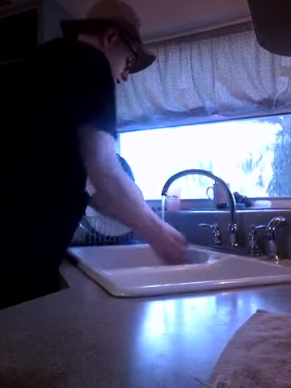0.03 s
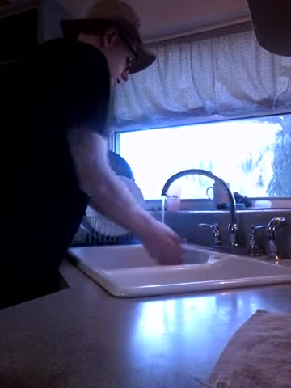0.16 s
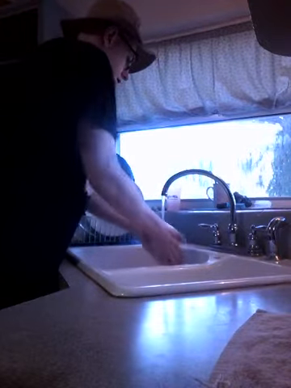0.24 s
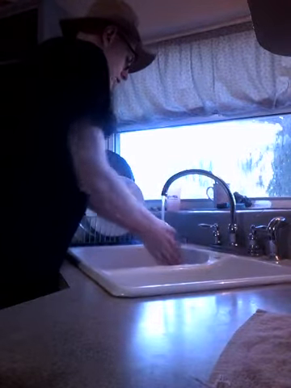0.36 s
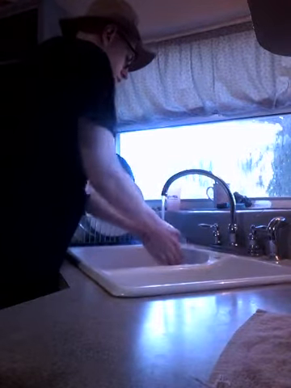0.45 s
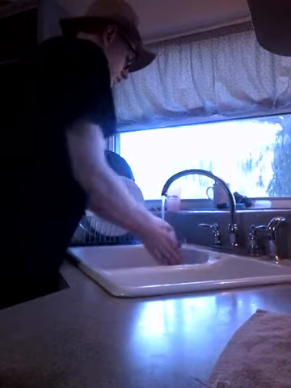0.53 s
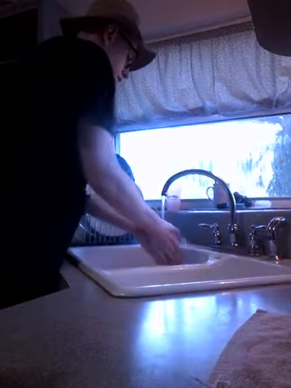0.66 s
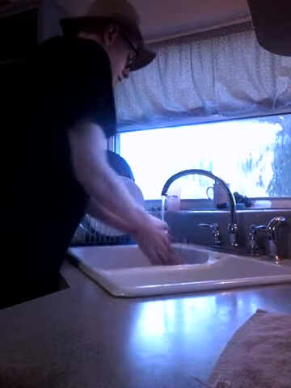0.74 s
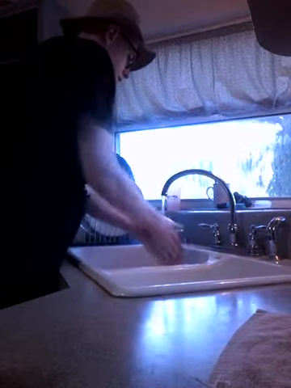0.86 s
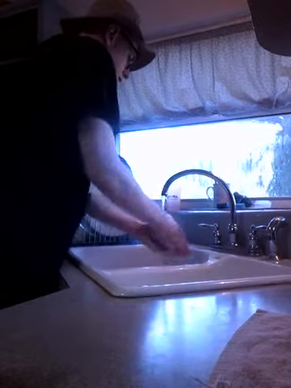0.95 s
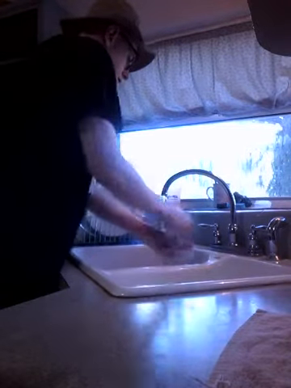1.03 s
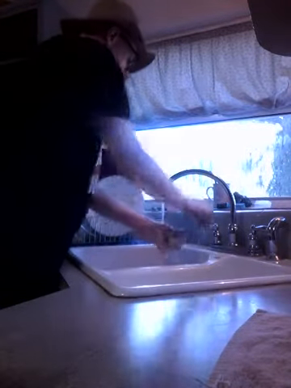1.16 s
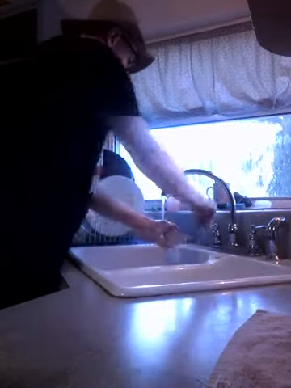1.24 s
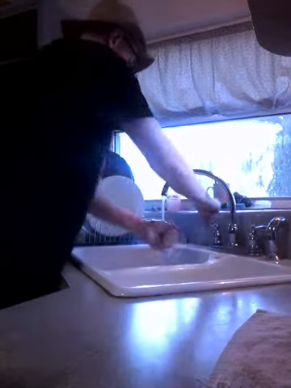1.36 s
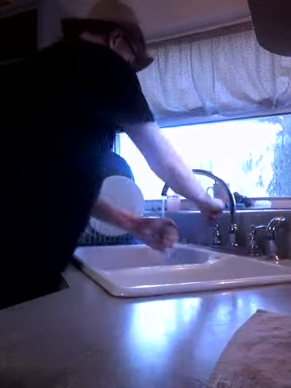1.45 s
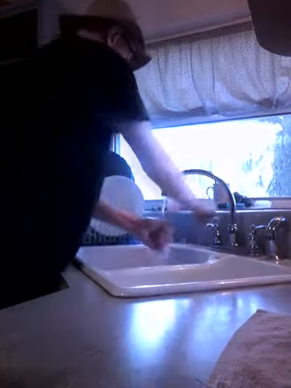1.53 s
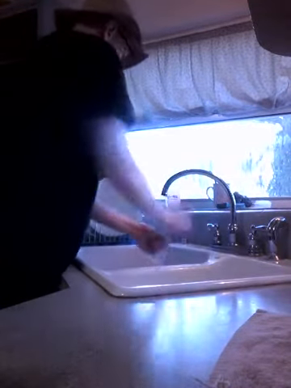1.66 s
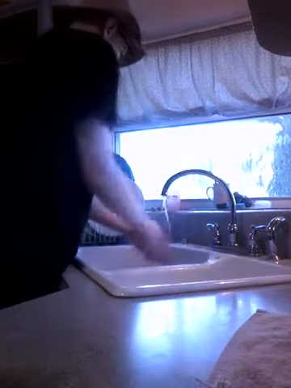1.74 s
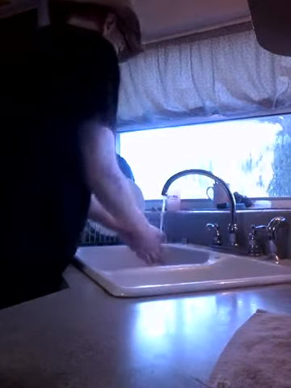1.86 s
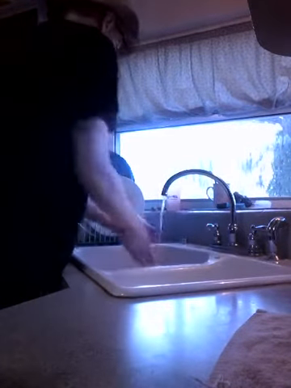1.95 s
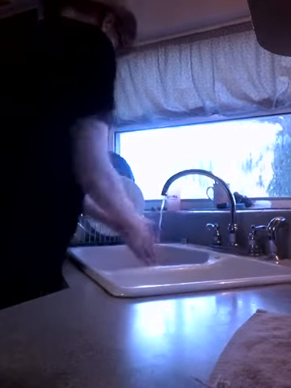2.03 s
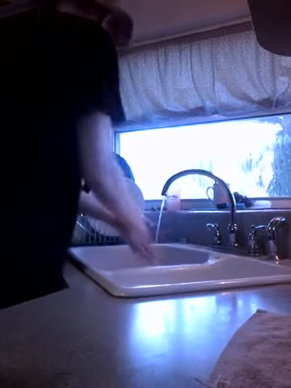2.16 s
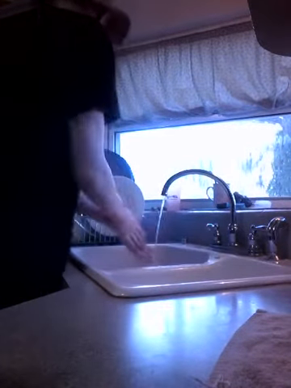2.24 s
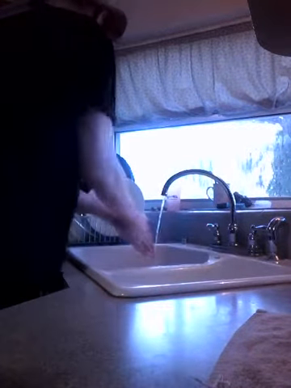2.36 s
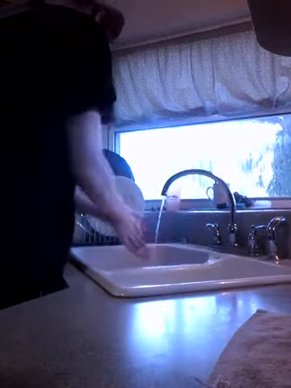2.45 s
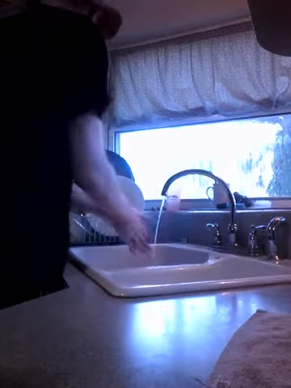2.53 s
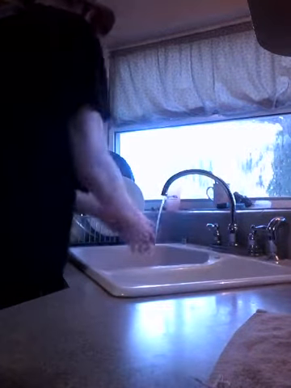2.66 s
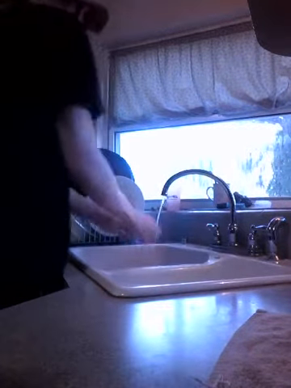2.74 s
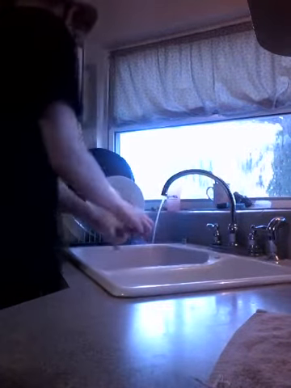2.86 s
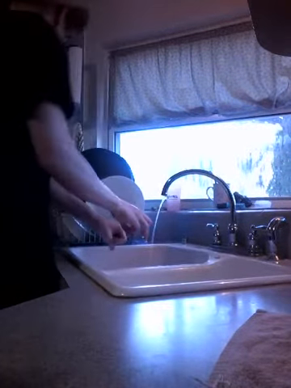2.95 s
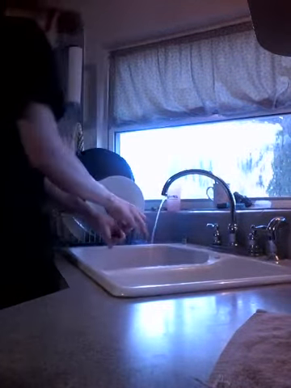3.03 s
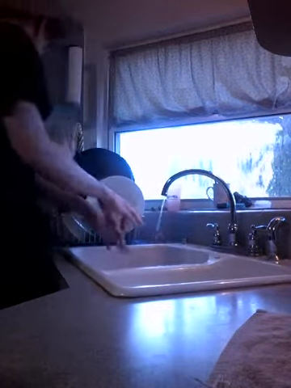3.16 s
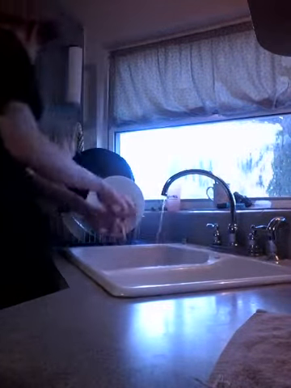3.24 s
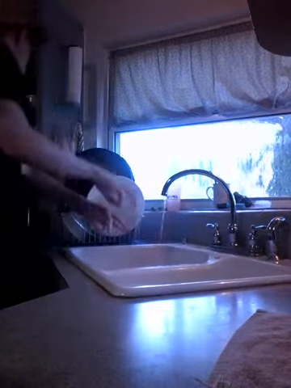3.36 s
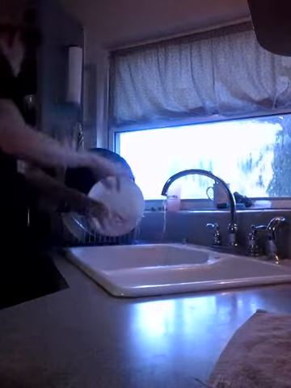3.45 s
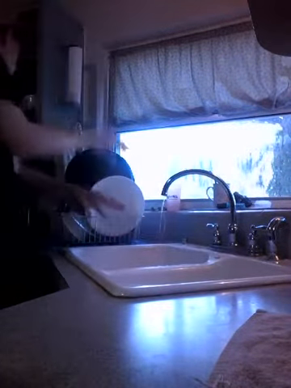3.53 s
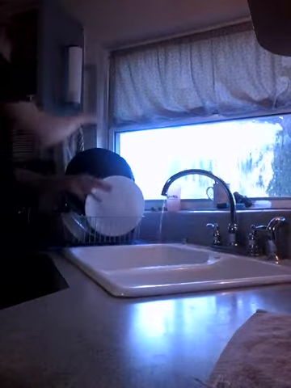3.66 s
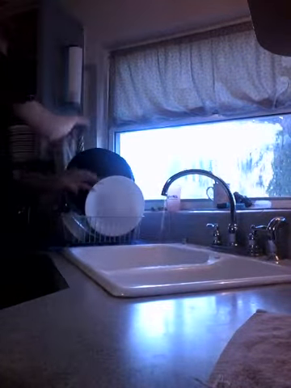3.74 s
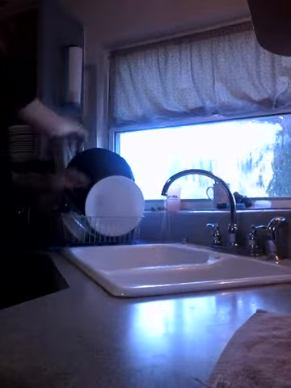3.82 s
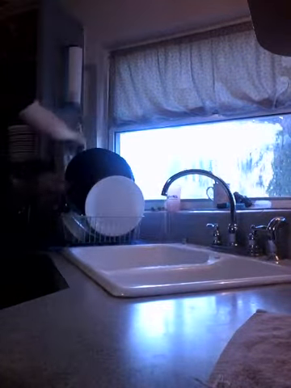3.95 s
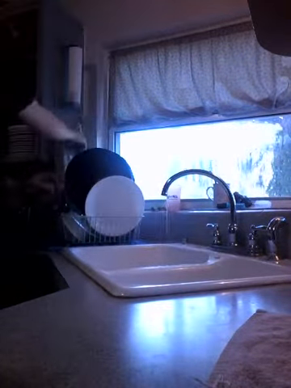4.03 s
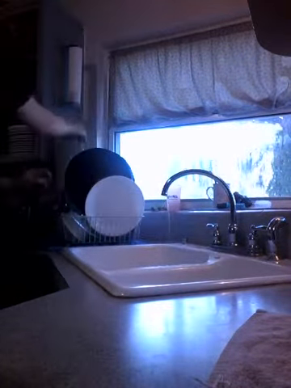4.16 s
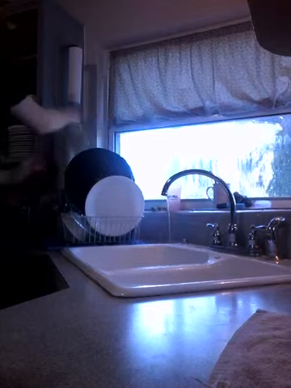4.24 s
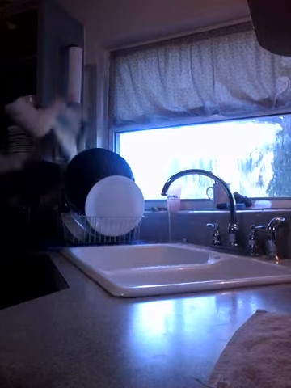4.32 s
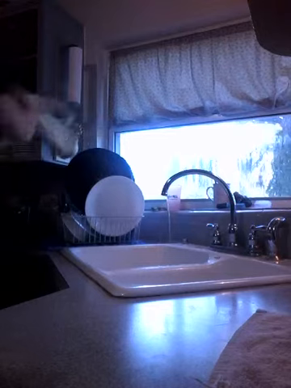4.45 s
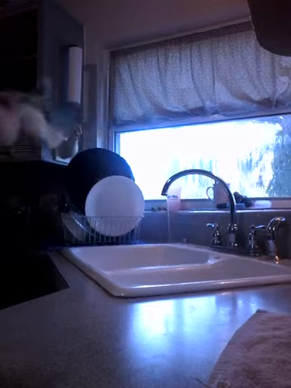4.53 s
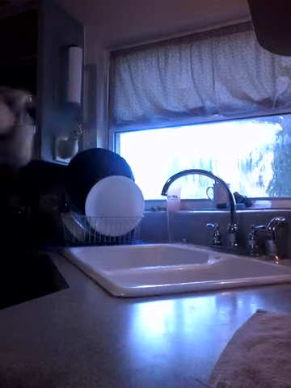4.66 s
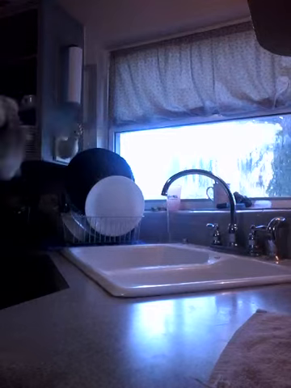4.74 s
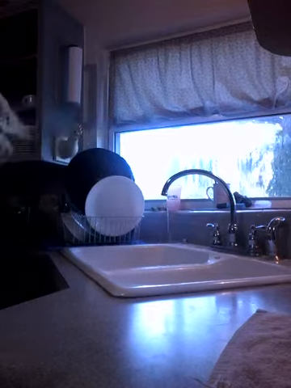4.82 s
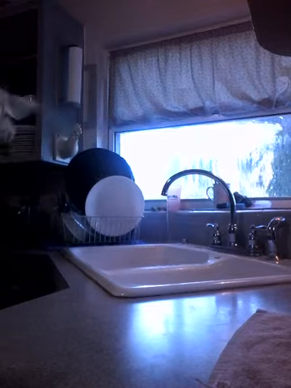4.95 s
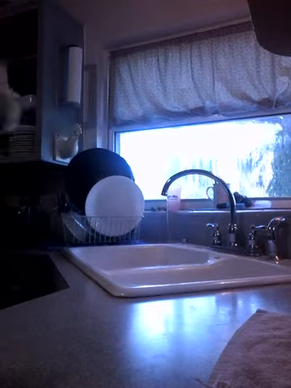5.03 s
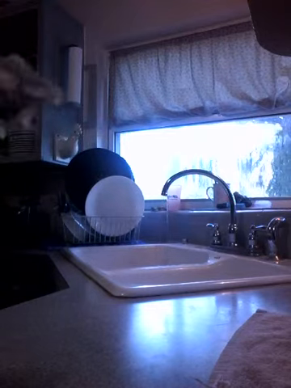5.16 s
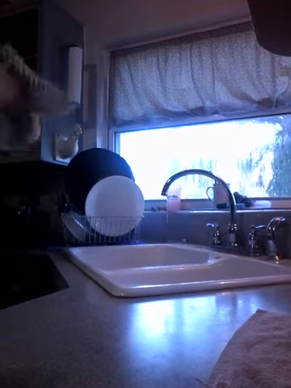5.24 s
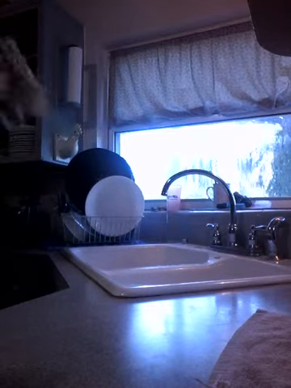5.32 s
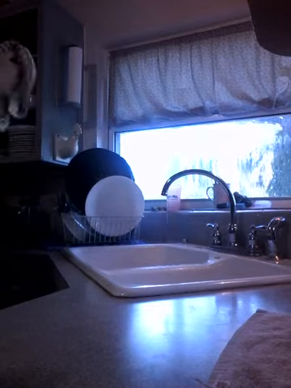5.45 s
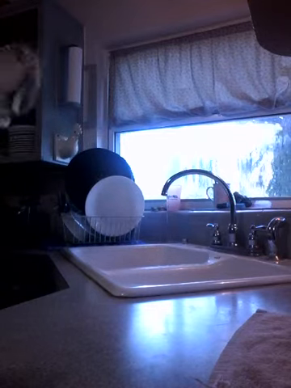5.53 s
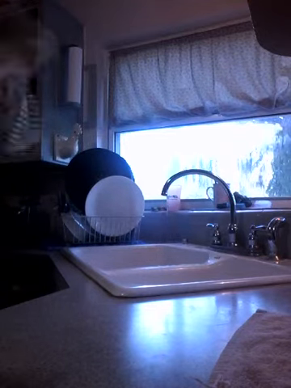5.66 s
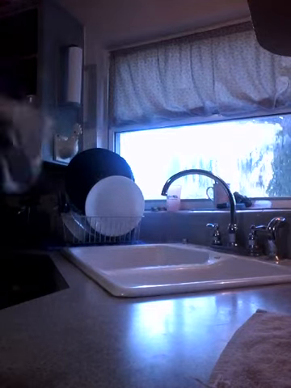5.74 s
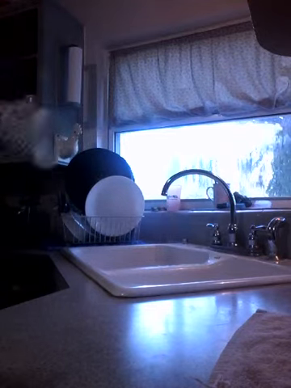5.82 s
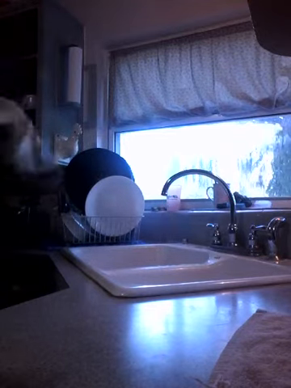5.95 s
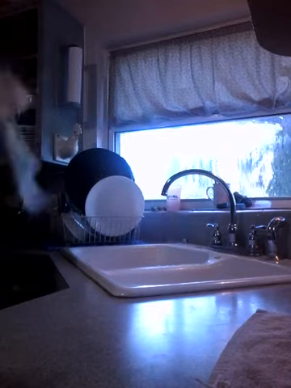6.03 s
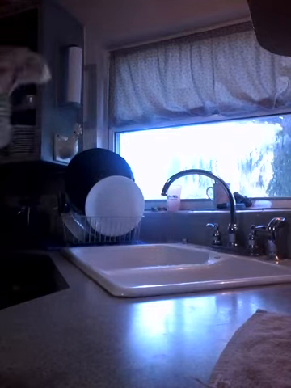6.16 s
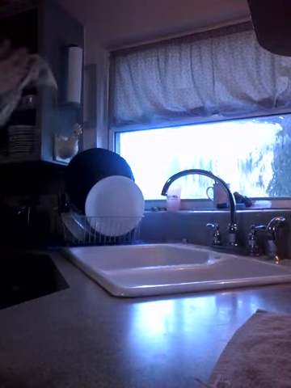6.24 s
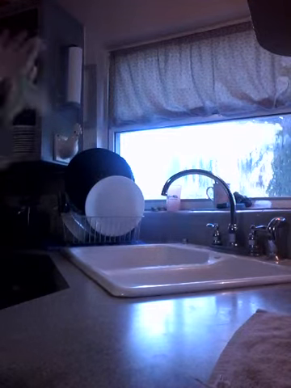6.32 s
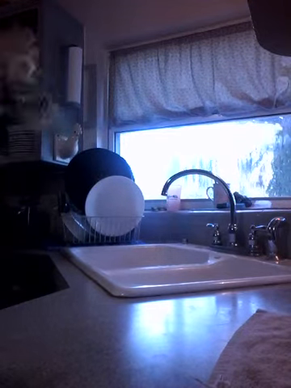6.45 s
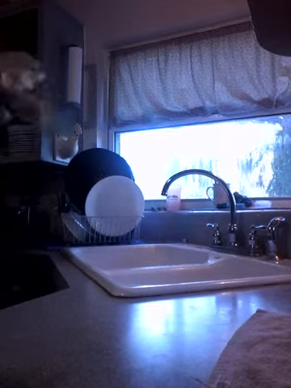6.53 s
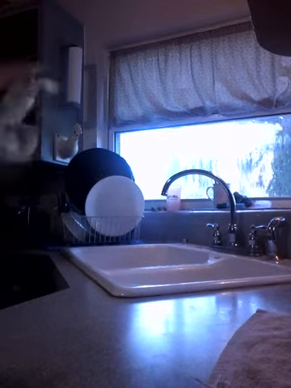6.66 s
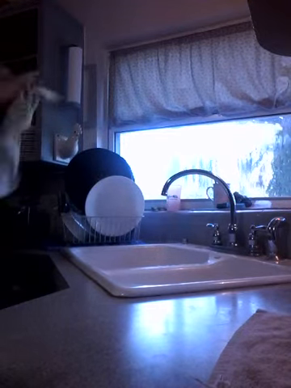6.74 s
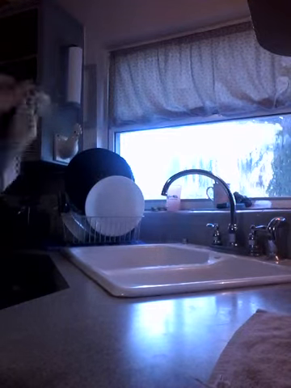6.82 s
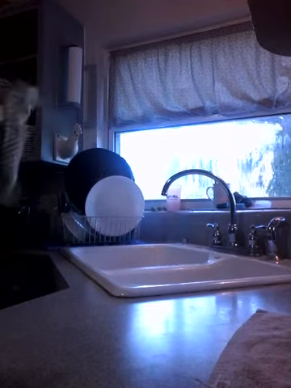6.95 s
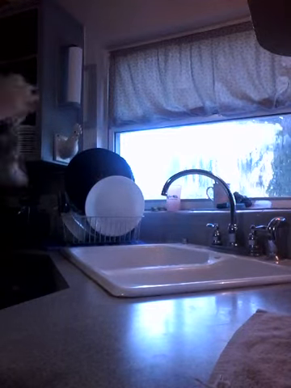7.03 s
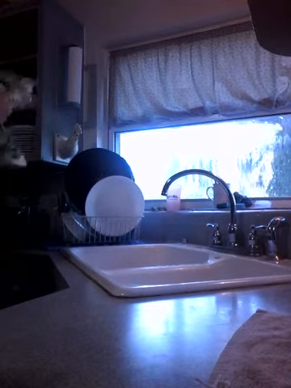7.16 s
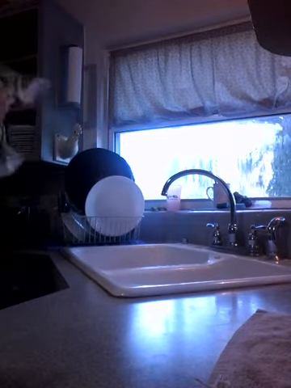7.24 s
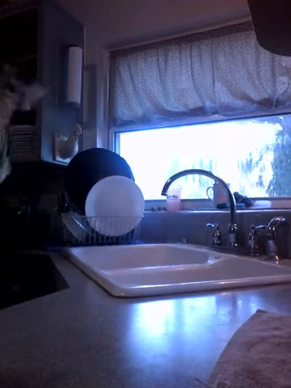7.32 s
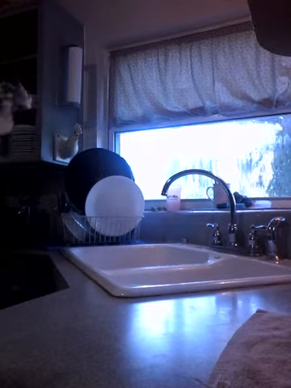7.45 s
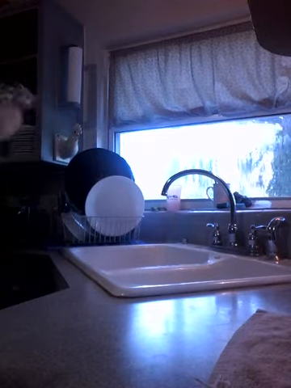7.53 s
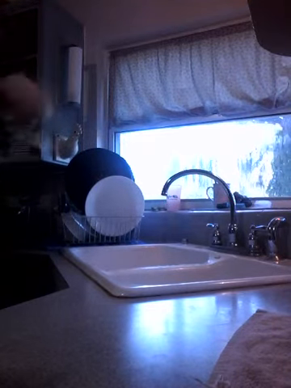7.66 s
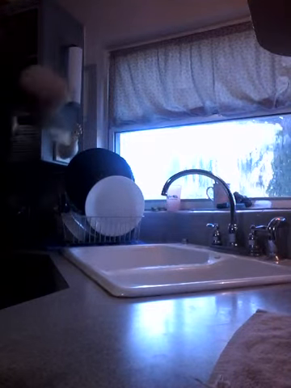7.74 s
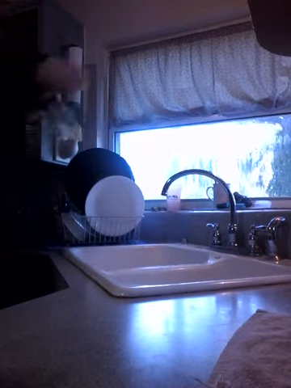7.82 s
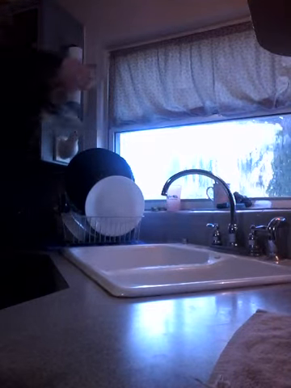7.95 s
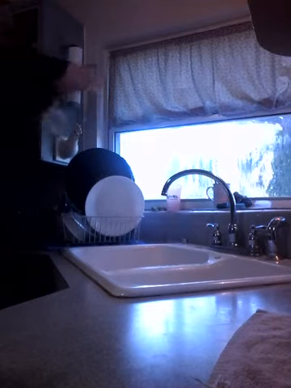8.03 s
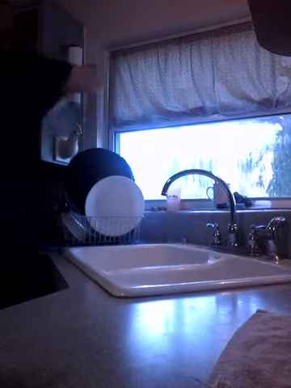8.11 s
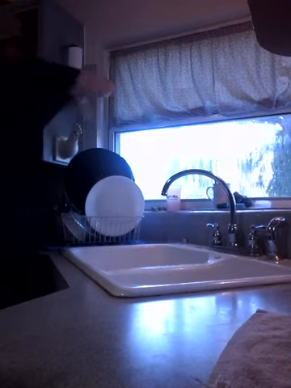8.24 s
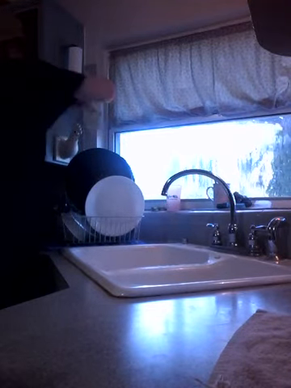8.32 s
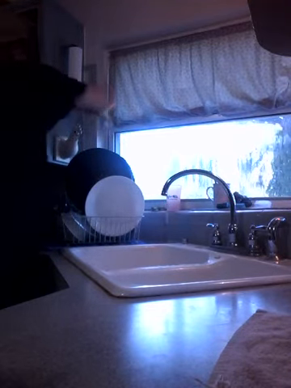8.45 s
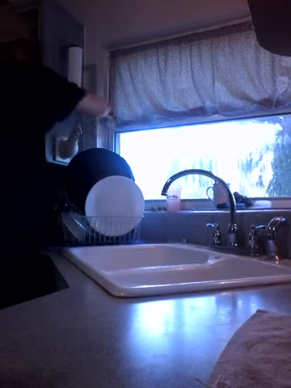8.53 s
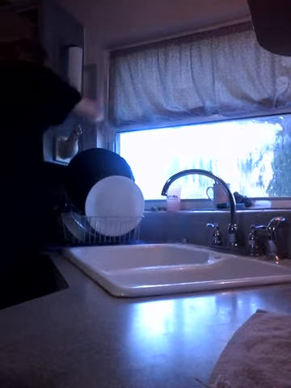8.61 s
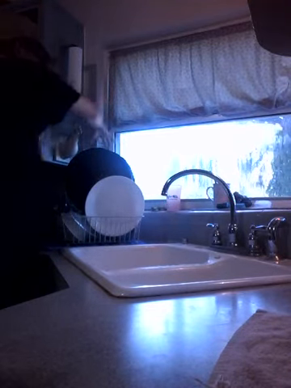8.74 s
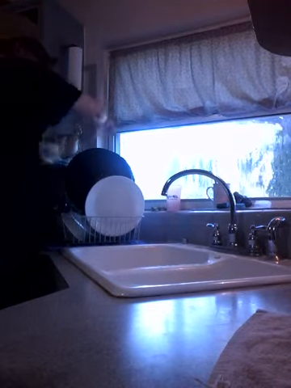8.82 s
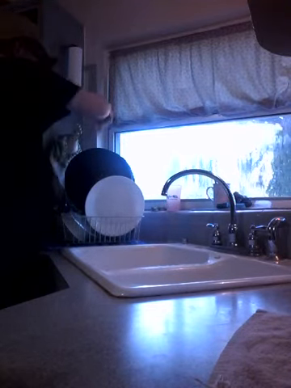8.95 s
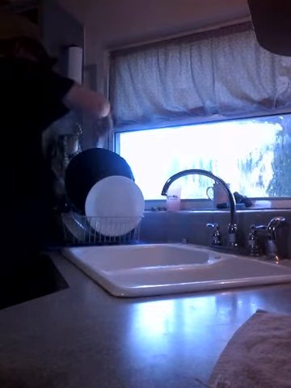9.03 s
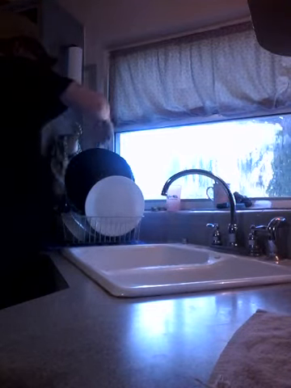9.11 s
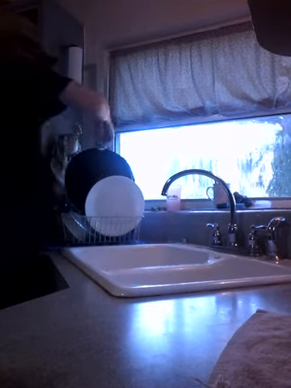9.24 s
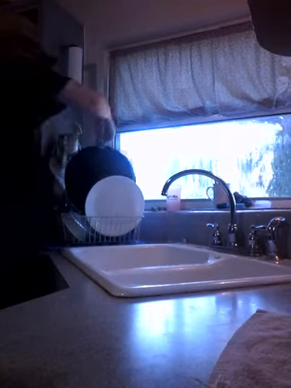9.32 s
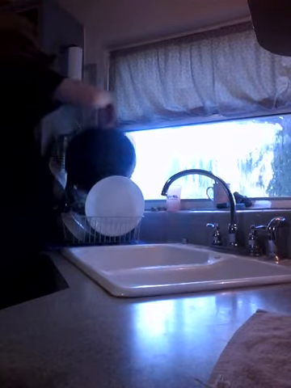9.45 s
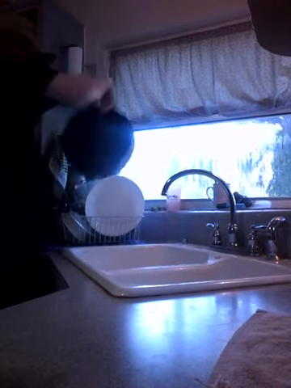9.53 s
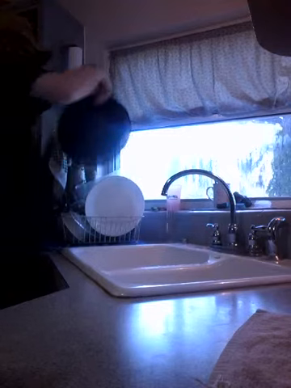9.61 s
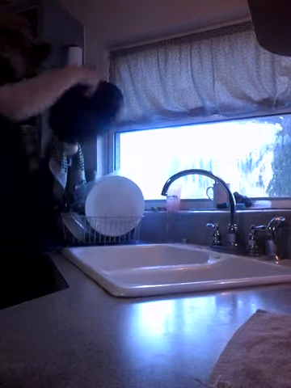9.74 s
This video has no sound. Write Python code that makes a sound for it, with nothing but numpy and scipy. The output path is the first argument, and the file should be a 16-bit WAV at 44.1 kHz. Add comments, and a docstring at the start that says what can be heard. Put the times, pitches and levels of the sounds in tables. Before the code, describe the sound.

Brisk watery slaps in a sink stop with a thin rising squeal; drips, faint cloth swishes and soft bumps follow before a ringing pan knock.

```python
"""Hands are rinsed under a kitchen tap: droplet hiss and slaps of short rising bubbles over pipe resonances.
The valve squeals shut, a narrow rising whistle; drops are shaken off and noise pulses gurgle in the drain.
Then a towel rubs the hands in swishes of grainy hiss, and things bump softly as damped low notes.
Dishes shift, and a pan knocked out of the rack cracks in noise bursts and rings in beating modes.
Low rumble fills the hard-walled kitchen, an echo of random taps; two small microphones a hand apart."""
import sys
import numpy as np
from scipy import signal
from scipy.fft import rfft, irfft, next_fast_len
from scipy.io import wavfile
from scipy.ndimage import uniform_filter1d

SR = 44100
rng = np.random.default_rng(int(sys.argv[2]) if len(sys.argv) > 2 else 0)


def generate_wav(signal):
    """Clip the signal to [-1, 1] and save it as 16-bit WAV at the path in sys.argv[1]."""
    frames = np.transpose(np.atleast_2d(signal))
    scaled = np.clip(frames, -1, 1) * 32767
    pcm = np.round(scaled).astype(np.int16)
    wavfile.write(sys.argv[1], SR, pcm)


N = 431298

# Colour of falling water. Each row: frequency in Hz, relative density in dB per Hz.
SPRAY_TONE = [(410, -47), (700, -15), (1460, -11.5), (2990, -11), (4150, -22.5), (5610, -16.5), (9110, -25),
              (14600, -23)]
# Slaps of water and flung drops in the basin.
# Each row: start in seconds, bubble level in dB, bubble pitch in Hz, spatter level in dB.
SPLASHES = [(0.011, -23, 2630, -40), (0.1201, -24.5, 1127, -36.5), (0.2308, -26.5, 1390, -39),
            (0.3296, -23.5, 1230, -43), (0.4287, -25.5, 2130, -38.5), (0.546, -24.5, 1660, -35.5),
            (0.632, -22.5, 2050, -38.5), (0.685, -26.5, 1710, -39), (0.7854, -22, 2840, -37),
            (0.8536, -22.5, 2140, -34.5), (0.932, -22, 2600, -42.5), (1.0893, -20, 2930, -32.5),
            (1.278, -26, 3200, -42.5), (1.326, -27, 1690, -37), (1.3662, -14.5, 2350, -39),
            (1.392, -20, 1764, -49), (1.397, -18, 3180, -46), (1.5377, -40, 5990, -41.5),
            (1.559, -18.5, 2060, -37), (1.601, -24.5, 2680, -34), (1.774, -33, 3580, -33.5),
            (1.8067, -23, 2600, -40.5), (1.983, -15.5, 2590, -40), (1.9946, -17.5, 2130, -52),
            (2.06, -27, 3060, -32), (2.072, -22.5, 1800, -52), (2.218, -32.5, 3140, -43),
            (2.254, -34, 5500, -47), (2.296, -31.5, 1700, -57), (2.31, -26, 3170, -43.5),
            (2.3423, -31, 1670, -62), (2.426, -34.5, 2100, -48.5), (2.456, -27, 3070, -65),
            (2.4737, -28.5, 2020, -44.5), (2.556, -29.5, 1600, -45.5), (2.678, -49, 5200, -50.5),
            (2.959, -45, 5440, -46.5), (3.081, -30, 2410, -49), (3.0998, -33, 6900, -43),
            (3.437, -43.5, 2400, -54)]
# Colour of the pan's crack on the rack. Each row: frequency in Hz, relative density in dB per Hz.
CRACK_TONE = [(60, -48), (150, -2), (250, 4.5), (1800, 4), (3300, 0), (4100, -8.5), (6000, -13),
              (16000, -67)]
# The pan strikes the rack and rebounds. Each row: start in seconds, level in dB.
KNOCK = [(9.4302, -14), (9.4352, -12.5), (9.4386, -21)]
# A plate in the rack is touched first. One row: start in seconds, ring level in dB.
PLATE_TOUCH = (9.36, -25.5)
EDGE_HZ = 15900  # upper band limit, also the reference for treble tilts
SHUT_AT_S = 1.411  # the tap shuts
SPATTER_S = 0.033  # time constant of the spatter's decay


def gain_of(db):
    """Decibels to an amplitude factor."""
    return 10 ** (np.asarray(db) / 20)


def evened(x):
    """Scales to rms 1."""
    return x / np.sqrt(np.mean(x ** 2) + 1e-20)


def read(points, hz):
    """A spectrum table at the given frequencies, interpolated along log frequency."""
    f, value = np.transpose(points)
    return np.interp(np.log(hz + 1), np.log(f + 1), value)


def columns(rows):
    """A gate that is open while a curve lasts, then each of its columns at every sample."""
    s, *values = np.transpose(rows)
    t = np.arange(N) / SR
    gate = uniform_filter1d(1. * ((t >= s[0]) & (t <= s[-1])), size=400)
    return gate, *(np.interp(t, s, v) for v in values)


def add(mix, s, sound):
    """Mixes a sound in at a time in seconds."""
    part = mix[round(s * SR):][:len(sound)]
    part += sound[:len(part)]


def coloured(x, db):
    """Filters by a function of frequency in dB."""
    size = next_fast_len(x.shape[-1] + 4096)
    gain = gain_of(db(np.fft.rfftfreq(size, 1 / SR)))
    return irfft(rfft(x, size) * gain, size)[..., :x.shape[-1]]


def resonate(x, hz, width):
    """Shifts the curve hz down to zero, smooths, and shifts back: a resonance of gain 1."""
    turn = np.exp(2j * np.pi * np.cumsum(hz * np.ones(x.shape[-1])) / SR)
    r = np.exp(-np.pi * width / SR)
    return 2 * (turn * signal.lfilter([1 - r], [1, -r], x / turn)).real


def humps(noise, modes):
    """Steady noise through a set of steep resonances, each at its own rms level."""
    size = next_fast_len(N)
    f = np.fft.rfftfreq(size, 1 / SR)
    shapes = [(db, 1 / (1 + (2 * (f - hz) / width) ** 2)) for hz, width, db in modes]
    response = sum(gain_of(db) * evened(shape) for db, shape in shapes)
    return irfft(rfft(noise, size) * response, size)[..., :N]


def grainy(spread_db, per_s, smooth):
    """Two channels of hiss mixed with droplet clicks of very unequal size."""
    size = gain_of(spread_db * np.minimum(rng.exponential(1, N), 5)) * (rng.random(N) < per_s / SR)
    burst = signal.lfilter([1], [1, -.95], size)  # each click spreads over half a millisecond
    return (smooth + evened(burst)) * rng.standard_normal((2, N))


def patchy(x, spread_db):
    """Colours a sound with drifting random patches of frequency and time."""
    z = signal.stft(x, nperseg=256)[2]
    field = uniform_filter1d(rng.standard_normal(z.shape[1:]), size=10, axis=0)
    field = evened(uniform_filter1d(field, size=10, axis=1))
    return signal.istft(z * gain_of(spread_db * field), nperseg=256)[1][:, :N]


def struck(modes, t):
    """A struck body's modes: dying sines, neighbours of opposite sign."""
    return sum((-1) ** k * gain_of(db - 60 * t / t60) * np.sin(2 * np.pi * hz * t)
               for k, (hz, db, t60) in enumerate(modes))


def hollow(rows, per_s, width, overtone):
    """Soft random pushes ring a hollow whose note wanders, with a broad overtone."""
    gate, level_db, hz = columns(rows)
    pushes = rng.standard_normal(N) * (rng.random(N) < per_s / SR)
    note = evened(resonate(resonate(pushes, hz, width), hz, 3 * width))
    upper = evened(resonate(resonate(pushes, 2.67 * hz, 250), 2.57 * hz, 240))
    return gate * gain_of(level_db) * (note + overtone * upper)


def rumble():
    """Steady low noise with a few wavering notes, over faint hiss."""
    # Colour of the room. Each row: frequency in Hz, relative density in dB per Hz.
    room_tone = [(20, -24), (45, -29), (65, -18), (100, -19.5), (170, -0.5), (230, -12), (600, -26.5),
                 (1200, -34), (3200, -49.5), (4000, -58), (5500, -52), (8000, -56), (14000, -48.5)]
    # Wavering notes in the rumble. Each row: frequency in Hz, width in Hz, level in dB.
    room_notes = [(135.3, 6.5, -47.5), (179.4, 5.1, -51), (753, 24, -67)]
    noise = rng.standard_normal((2, N))
    bed = evened(coloured(noise, lambda hz: read(room_tone, hz)))
    return bed * gain_of(-39.5) + humps(noise, room_notes)


def kitchen(x):
    """Hard walls as sparse taps of random sign, one in every 20 samples, each band dying at its own speed."""
    # Decay of the room. Each row: frequency in Hz, time to fall 60 dB in seconds.
    decay = [(100, 0.056), (500, 0.58), (2000, 0.12), (6000, 0.14), (15000, 0.18)]
    taps = np.zeros((2, SR))
    at = np.arange(100, SR - 20, 20) + rng.integers(0, 20, (2, (SR - 101) // 20))
    np.put_along_axis(taps, at, rng.choice([-1., 1.], at.shape), 1)
    hz, t, z = signal.stft(taps, SR, nperseg=256)
    tail = signal.istft(z * gain_of(-60 * t / read(decay, hz)[:, None]), SR, nperseg=256)[1]
    return signal.fftconvolve(x * np.ones((2, 1)), tail / np.linalg.norm(tail[0]), axes=1)[:, :N]


def squeaks():
    """Faint squeaks and ticks: short fuzzy tones of resonated noise; the shorter, the broader."""
    # Each row: start in seconds, pitch in Hz, level in dB, length in seconds.
    faint_tones = [(3.96, 1733, -61, 0.082), (6.452, 6100, -48.5, 0.021), (6.745, 2990, -64, .045),
                   (7.503, 1450, -53, 0.021)]
    out = np.zeros(N)
    for s, hz, db, length in faint_tones:
        t = np.arange(0, length, 1 / SR)
        width = hz * (0.014 / length) ** 2
        tone = resonate(resonate(rng.standard_normal(4000), hz, width), hz, width)[-len(t):]
        add(out, s, gain_of(db) * evened(tone) * np.sin(np.pi * (t / length) ** 0.7))
    return out


def bumps():
    """A quickly damped low note with a looser overtone, and a short dull click."""
    # Soft bumps. Each row: start in seconds, note level in dB, pitch in Hz, click level in dB.
    soft_knocks = [(1.45, -22, 297, -36.5), (1.566, -23, 331, -40.5), (1.805, -29, 294, -49),
                   (2.118, -25.5, 603, -40.5), (3.944, -47, 503, -45.5), (3.99, -24, 285, -50),
                   (4.38, -34.5, 278, -49), (4.485, -37, 714, -44.5), (5.315, -21.5, 133.4, -42.5),
                   (5.62, -26, 171, -57), (5.751, -32, 169, -45.5), (7.134, -39, 298, -48),
                   (8.864, -34.5, 530, -50), (9.22, -32.5, 250, -49)]
    decay_cycles, click_t60_s = 3.45, 0.13  # cycles in one time constant; seconds to fall 60 dB
    out, t = np.zeros(N), np.arange(8000) / SR
    rattle = evened(resonate(resonate(rng.standard_normal(N), 900, 1400), 900, 1400))
    for s, db, hz, click_db in soft_knocks:
        note = np.sin(2 * np.pi * hz * t) + 0.24 * np.sin(2 * np.pi * 1.7 * hz * t)
        note = note * (1 - np.exp(-t / 0.0011))
        click = gain_of(click_db - 60 * t / click_t60_s) * (1 - np.exp(-t / 0.00038))
        click = click * rattle[round(s * SR):][:len(t)]
        add(out, s, gain_of(db) * np.exp(-t * hz / decay_cycles) * note + click)
    return out


def dishes():
    """Crockery slides and settles on the wires: dense random pushes ring a wandering note."""
    # Dishes shift in the rack. Each row: time in seconds, level in dB, note in Hz.
    shift = [(8.84, -63, 394), (8.95, -42, 400), (9.03, -43.5, 307), (9.16, -58, 300)]
    return hollow(shift, 530, 130, 0.062)


def clatter():
    """The plate's tick, three quick bright cracks of the pan, and the rattle of the rack's wires."""
    out, t = np.zeros(N), np.arange(SR // 2) / SR
    crack = evened(coloured(rng.standard_normal(len(t)), lambda hz: read(CRACK_TONE, hz)))
    snap = coloured(crack, lambda hz: 22 * hz / EDGE_HZ)  # brighter
    for k, (s, db) in enumerate(KNOCK):
        envelope = gain_of(db - 60 * t / 0.015) * (1 - np.exp(-t / 0.00044))
        add(out, s, envelope * np.roll(snap, shift=999 * k))  # a different stretch of noise each time
    add(out, KNOCK[0][0], gain_of(-25.5 - 60 * t / 0.5) * (1 - np.exp(-t / 0.026)) * crack)
    add(out, PLATE_TOUCH[0], gain_of(-40.5 - 60 * t / 0.24) * crack)
    return out


def pan():
    """The plate rings at its touch and again with the pan, whose modes beat, the upper ones swelling."""
    # Modes of the pan. Each row: frequency in Hz, relative level in dB, time to fall 60 dB in seconds.
    pan_modes = [(200, 1, 0.22), (295, -10, 0.63), (358, -18, 1.1), (424, -16.5, 3.3), (509, -18, 1),
                 (678, -18, 0.35), (751, -22, 1.2), (814, -16.5, 1), (937, -21, 1), (1114, -22, 0.75),
                 (1233, -9, .2), (1288, -5, 0.3), (1492, -15, 0.45), (1808, -9, .35), (1844, 2, 0.37),
                 (1942, -13, .43), (2290, -15, 0.47), (2643, -10, 0.35), (2826, -9, .33), (3128, -15, .45),
                 (3283, -9.5, 0.5), (3499, -14, .35)]
    # Modes of the plate. Each row: frequency in Hz, relative level in dB, time to fall 60 dB in seconds.
    plate_modes = [(468, -2, .07), (1755, -1, .16), (2266, -15, .25)]
    beat_depth, beat_per_hz = .45, .007  # share of a mode's level; most beats a second per Hz of pitch
    swell_above_hz, wire_hz = 250, (3500, 7000)  # the rack's wires ring anywhere between the pair
    out, t = np.zeros(N), np.arange(SR // 2) / SR
    speed, phase = rng.random((len(pan_modes), 2)).T
    ringing = np.zeros(len(t))
    for k, mode in enumerate(pan_modes):
        beat = 1 + beat_depth * np.cos(2 * np.pi * (beat_per_hz * mode[0] * speed[k] * t + phase[k]))
        slow_rise, quick_rise = 1 - 0.88 * np.exp(-t / 0.053), 1 - np.exp(-t / .003)
        rise = slow_rise if mode[0] > swell_above_hz else quick_rise
        ringing += (-1) ** k * struck([mode], t) * beat * rise
    place, damping = rng.random((40, 2)).T
    hz = np.interp(place, (0, 1), wire_hz)
    wires = struck(zip(hz, read(CRACK_TONE, hz), 0.22 + .3 * damping), t) * (1 - np.exp(-t / .025))
    plate = struck(plate_modes, t)
    add(out, PLATE_TOUCH[0], gain_of(PLATE_TOUCH[1]) * plate)
    add(out, KNOCK[1][0], gain_of(-25) * plate)
    add(out, KNOCK[0][0], gain_of(-16) * ringing + gain_of(-27) * wires)
    return out


def towel():
    """Cloth fibres brush the skin: swishes of soft hiss with a little crackle over a steady rustle."""
    # Towel strokes on skin. Each row: middle in seconds, level in dB, length in seconds.
    swishes = [(4.735, -59, 0.15), (5.042, -56.5, 0.15), (5.417, -55.5, 0.055), (5.589, -50.5, 0.089),
               (5.778, -54, 0.057), (5.949, -48.5, 0.12), (6.332, -56.5, 0.27), (6.678, -53.5, 0.043),
               (6.922, -55, 0.078), (7.378, -57.5, 0.1), (7.597, -58, 0.063)]
    # Colour of the cloth. Each row: frequency in Hz, relative density in dB per Hz.
    cloth_tone = [(700, 1), (1300, -5.5), (2200, -1.5), (3200, -4.5), (4000, -15), (5500, -10),
                  (15000, -21.5)]
    rustle_db, from_s, to_s = -65.5, 3.25, 8.6  # rustle while the hands are dried
    t, near = np.arange(N) / SR, np.arange(-.2, .2, 1 / SR)
    strokes = gain_of(rustle_db) * uniform_filter1d(1. * (t > from_s) * (t < to_s), size=9000)
    for s, db, length in swishes:
        add(strokes, s + near[0], gain_of(db) * np.exp(-(2 * near / length) ** 4 / 2))
    return strokes * evened(coloured(grainy(3.1, 870, 2.8), lambda hz: read(cloth_tone, hz)))


def drain():
    """Slow big bubbles in the drain pipe; the basin hums along."""
    # Water running down the drain. Each row: time in seconds, level in dB, cavity note in Hz.
    gurgle = [(2.0, -46, 250), (2.12, -38, 260), (2.3, -46.5, 242), (2.52, -41, 300), (2.7, -44, 356),
              (2.9, -67, 250)]
    # Basin hums as water runs away. Each row: frequency in Hz, width in Hz, relative level in dB.
    basin_modes = [(286, 24, -10), (383.5, 18, -10), (608, 71, -14.5)]
    gate, level_db, _ = columns(gurgle)
    hum = humps(rng.standard_normal(N), basin_modes)
    return hollow(gurgle, 300, 80, 0.24) + gate * gain_of(level_db) * hum


def valve():
    """The last thin jet whistles upward as the gap narrows: noise in a rising resonance."""
    # Valve closing. Each row: time in seconds, pitch in Hz, level in dB.
    squeal = [(1.34, 9450, -48), (1.38, 9580, -36.5), (1.42, 9860, -34.5), (1.465, 10720, -41.5),
              (1.5, 11000, -74)]
    gate, hz, level_db = columns(squeal)
    whistle = resonate(resonate(rng.standard_normal(N), hz, 120), hz, 120)
    return gate * gain_of(level_db) * evened(whistle)


def flow_db():
    """How far the stream has fallen below full flow: the valve eases down, then shuts."""
    ease_s, ease_db_per_s, shut_db_per_s = 0.045, 45, 390
    after = np.arange(N) / SR - SHUT_AT_S
    return -ease_db_per_s * np.clip(after + ease_s, 0, ease_s) - shut_db_per_s * np.maximum(after, 0)


def tap():
    """Turbulence in the valve excites the pipe and basin resonances."""
    # Pipe and basin. Each row: frequency in Hz, width in Hz, relative level in dB.
    pipe_modes = [(618, 160, -8), (1209, 142, -1.5), (2010, 52, -4.5), (279, 194, -0.5)]
    return gain_of(-42 + flow_db()) * humps(rng.standard_normal((2, N)), pipe_modes)


def droplets():
    """Each slap's spatter holds a few tiny drops that ping high and briefly."""
    droplet_hz = (4660, 7500)  # the finest drops ping between these pitches
    out, t = np.zeros(N), np.arange(400) / SR
    for (s, _, _, spatter_db), clump in zip(SPLASHES, rng.random((len(SPLASHES), 10, 3))):
        for late, pitch, size in clump:
            f = np.interp(pitch, (0, 1), droplet_hz)
            ping = np.sin(2 * np.pi * f * t) * np.exp(-t * f / 7)
            add(out, s + SPATTER_S * late ** 2, gain_of(spatter_db + 11.5 - 27 * size) * ping)
    return out


def spatter():
    """Each slap throws fine drops across the basin: a sudden wide hiss that dies quickly."""
    shape, t = np.zeros(N), np.arange(6000) / SR
    decay = np.exp(-t / SPATTER_S) + 0.91 * np.exp(-t / 0.0035)
    for s, _, _, spatter_db in SPLASHES:
        add(shape, s, gain_of(spatter_db) * decay * (1 - np.exp(-t / 0.0004)))

    def tone(hz):
        """The water's colour with less bass and more treble."""
        return read(SPRAY_TONE, hz) - 16 / (1 + (hz / 4500) ** 4) + 5 * hz / EDGE_HZ

    return shape * evened(coloured(grainy(5.6, 3500, 1.6), tone))


def bubbles():
    """Each slap traps a clump of short-lived rising bubbles; all but its first are fainter after the shut."""
    clump_s = .03  # the bubbles of one slap spread over this
    out, t = np.zeros(N), np.arange(2000) / SR
    for (s, db, hz, _), clump in zip(SPLASHES, rng.random((len(SPLASHES), 20, 3))):
        top_hz = max(min(2.14 * hz, 4100), 1.2 * hz)
        for k, (late, detune, size) in enumerate(clump):
            f, wait, drop_db = hz, 0, 0  # the first bubble has the listed pitch and level
            if k > 0:
                f = 0.843 * hz + detune * (top_hz - 0.846 * hz)
                wait = clump_s * late ** 1.4
                drop_db = 5 + 13.3 * size + 3.8 * (s > SHUT_AT_S)
            ring = np.sin(2 * np.pi * f * t * (1 + 8.4 * t)) * np.exp(-t * f / 6)
            add(out, s + wait, gain_of(db - drop_db) * ring * (1 - np.exp(-t / 0.00035)))
    return out


def spray():
    """Thousands of droplets, a few of them heavy; later sparser, finer drops run off the fingers."""
    # Water running off the wet hands once the tap is shut. Each row: time in seconds, level in dB.
    runoff = [(1.45, -47), (1.65, -41.5), (2.25, -46.5), (2.85, -58), (3.9, -77)]
    gate, runoff_db = columns(runoff)
    wander = uniform_filter1d(uniform_filter1d(rng.standard_normal(N), size=900), size=900)
    uneven_db = 2.4 * evened(wander)
    stream = evened(coloured(grainy(6.0, 1800, 3.2), lambda hz: read(SPRAY_TONE, hz)))
    drops = evened(coloured(grainy(4.2, 200, 2.8), lambda hz: read(SPRAY_TONE, hz) + 12 * hz / EDGE_HZ))
    stream = gain_of(-40 + 0.63 * flow_db()) * stream  # falls less steeply than the pipe
    return gain_of(uneven_db) * (stream + gate * gain_of(runoff_db) * drops)


def scene():
    """Single sources reach the left microphone a little late; near sounds lean left or right by frequency."""
    # Lean of the near sounds. Each row: frequency in Hz, left minus right in dB.
    lean = [(250, 3), (500, -8.5), (2500, -5.5), (6000, 0)]
    drips = bubbles() + droplets()
    points = valve() + drain() + dishes() + clatter() + squeaks()
    ring, thuds = pan(), bumps()
    direct = points + ring + thuds + drips
    direct = np.array([np.roll(direct, shift=4), direct])  # left late by 4 samples
    wide = patchy(spray() + spatter(), spread_db=2.5) + towel()
    to_walls = points + .22 * ring + 0.65 * thuds + 0.86 * drips + .5 * wide
    near = direct + wide + tap() + gain_of(-1.0) * kitchen(to_walls)
    return coloured(near, lambda hz: np.array([[.5], [-.5]]) * read(lean, hz)) + rumble()


def record(dry):
    """Close microphones differ little in the bass; a low cut and the band limit."""
    # Bass reaches both microphones alike. Each row: frequency in Hz, gain of the side signal in dB.
    side_gain = [(60, -11), (150, -30), (300, -13), (700, -4.5), (1500, -0.5)]
    mid = (dry[0] + dry[1]) / 2
    side = coloured((dry[0] - dry[1]) / 2, lambda hz: read(side_gain, hz))
    low_cut = signal.butter(2, 40, "high", fs=SR, output="sos")
    pair = signal.sosfilt(low_cut, [mid + side, mid - side])
    band_limit = signal.firwin(511, EDGE_HZ, window=("kaiser", 9), fs=SR)
    return signal.oaconvolve(pair, band_limit[None], "same")


dry = scene()
out = record(dry)
generate_wav(out)
```